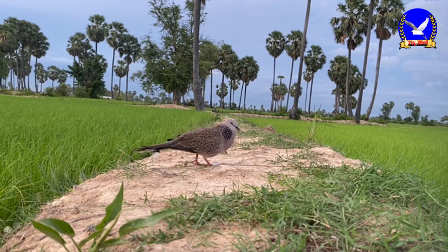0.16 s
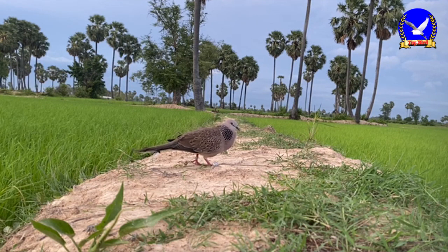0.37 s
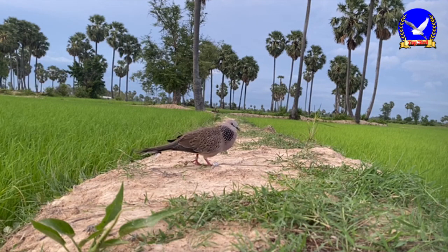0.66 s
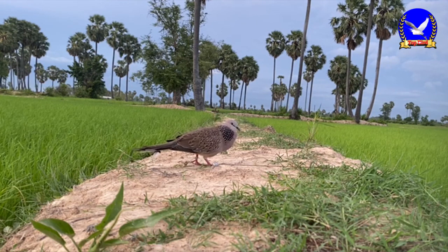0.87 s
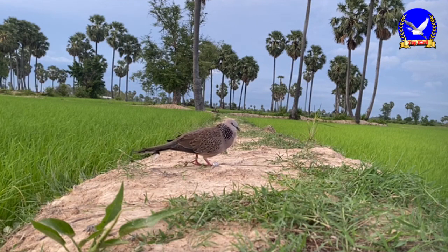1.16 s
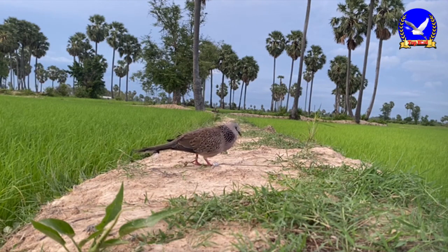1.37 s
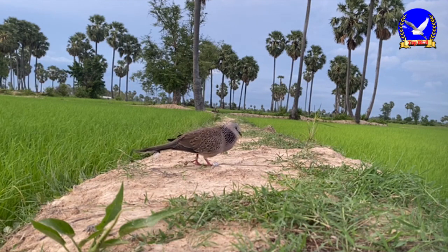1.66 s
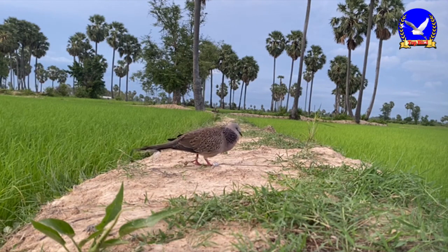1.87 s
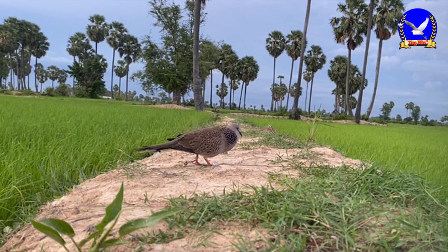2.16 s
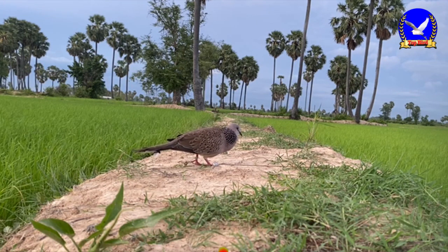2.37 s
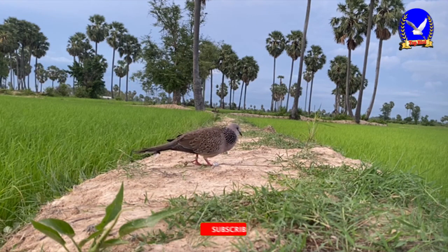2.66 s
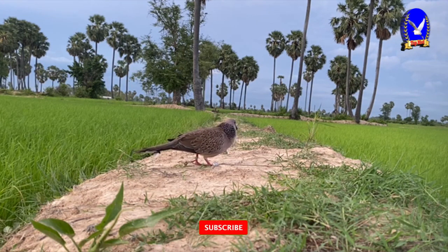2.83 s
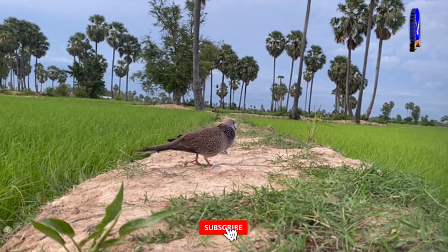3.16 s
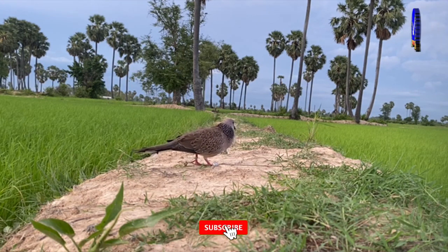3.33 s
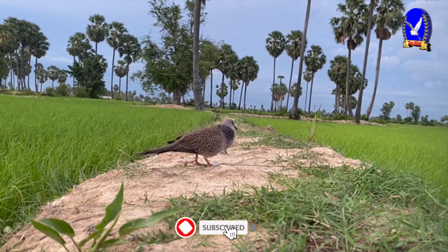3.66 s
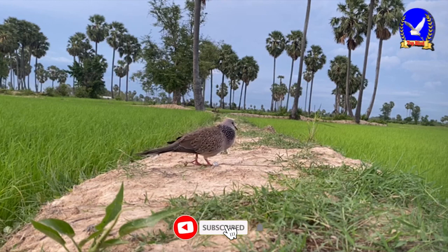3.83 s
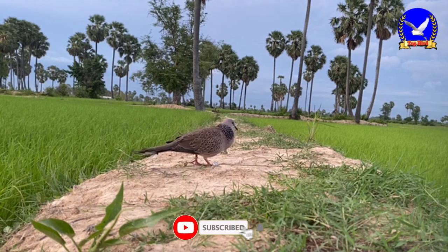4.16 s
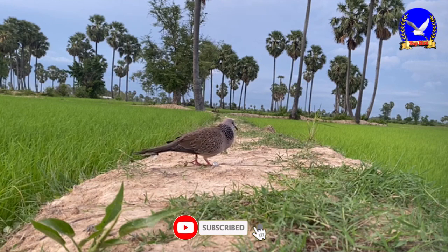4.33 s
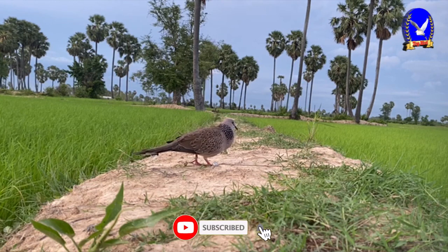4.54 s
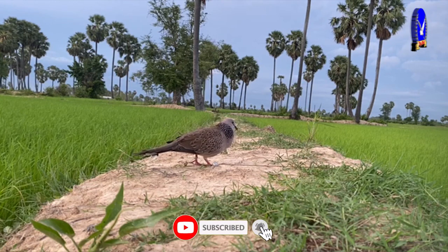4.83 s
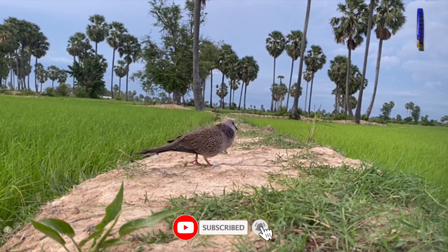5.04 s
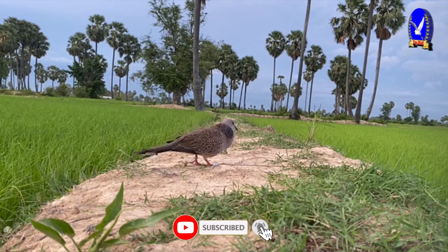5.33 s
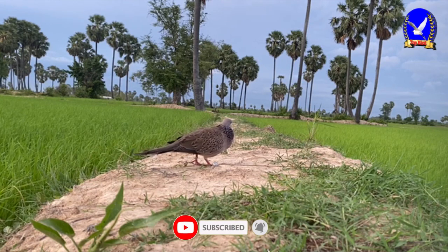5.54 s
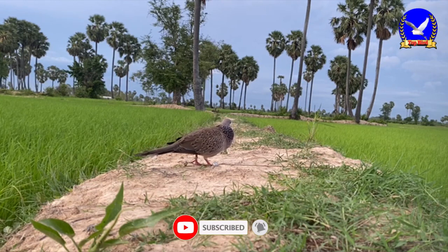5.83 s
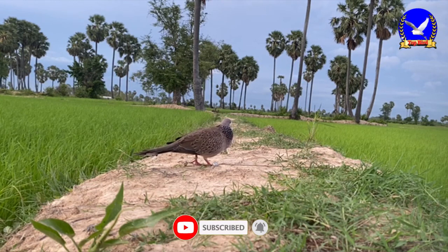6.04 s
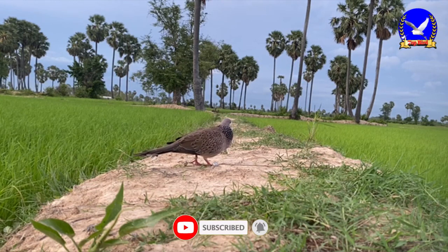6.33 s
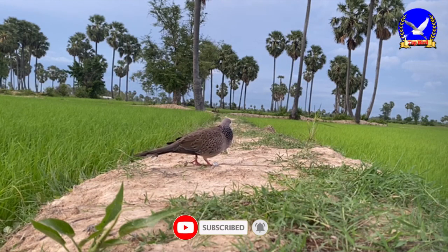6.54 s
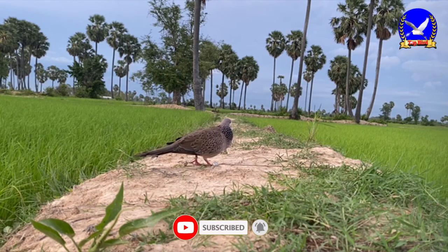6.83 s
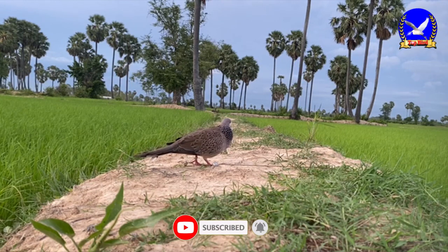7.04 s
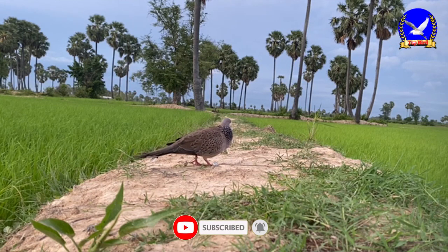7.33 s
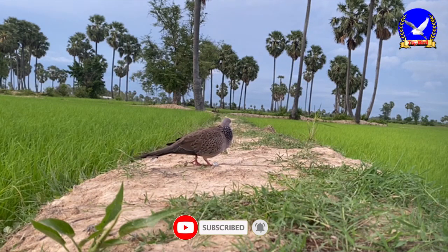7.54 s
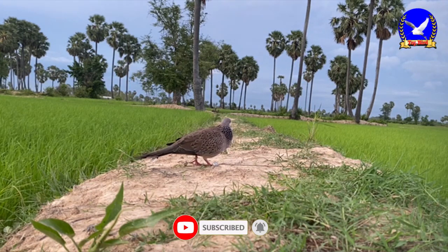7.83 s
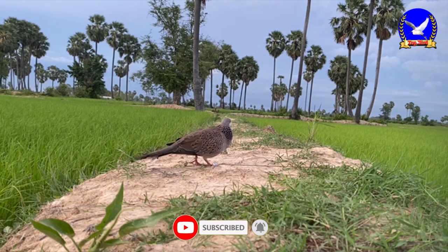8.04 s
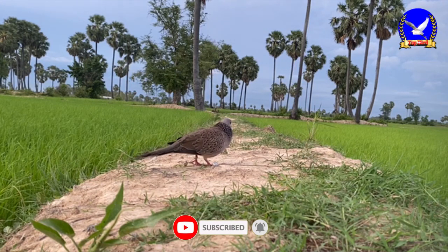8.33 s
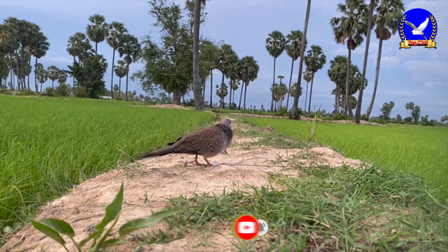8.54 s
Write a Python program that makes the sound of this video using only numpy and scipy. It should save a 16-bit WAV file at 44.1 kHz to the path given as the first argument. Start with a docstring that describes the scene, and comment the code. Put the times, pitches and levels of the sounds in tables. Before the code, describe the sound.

A spotted dove close to the microphone gives mellow, nearly pure coos in short runs, the longer notes chopped into a quickening purr and dropping at the end. Pauses between runs reveal a thin steady insect buzz, faint rasping frogs far off, tiny bird whistles, slight grass rustle and a low, lumpy wind rumble. The place is open farmland, almost without echo.

```python
"""A spotted dove coos close to the microphone on a bank between rice fields, in runs of two or three notes.
Each coo is an almost pure tone that the throat chops into a quickening trill, with faint echoes.
Around it an insect buzzes steadily as pulsed, narrow noise; frogs rasp far off as ringing noise bursts.
Faint marsh notes and small birds are gliding or steady sines, rustling grass is crackling noise, and
light wind rumbles on the microphone as low, lumpy noise."""
import sys
import numpy as np
from scipy import signal
from scipy.fft import rfft, irfft
from scipy.io import wavfile
from scipy.ndimage import uniform_filter1d

SR = 44100
rng = np.random.default_rng(int(sys.argv[2]) if len(sys.argv) > 2 else 0)


def to_wav(sig):
    """Store sig (one row per channel, or 1-D mono) as 16-bit WAV at the path in sys.argv[1].

    Samples outside -1..1 are clipped; the rate is SR.
    """
    pcm = np.clip(np.atleast_2d(sig), -1, 1) * 32767
    pcm = np.round(pcm).astype(np.int16)
    wavfile.write(sys.argv[1], SR, pcm.T)  # frames by channels


N = 383229
TIME = np.arange(N) / SR


def gain_of(db):
    """Decibels to an amplitude factor."""
    return 10 ** (np.asarray(db) / 20)


def evened(x):
    """Scales to rms 1."""
    return x / np.sqrt(np.mean(x ** 2) + 1e-20)


def noise():
    """White noise as long as the scene."""
    return rng.standard_normal(N)


def phase_of(hz):
    """Running phase in radians of a changing frequency."""
    return 2 * np.pi * np.cumsum(hz) / SR


def add(mix, s, sound):
    """Mixes a sound in at time s."""
    part = mix[max(round(s * SR), 0):][:len(sound)]
    part += sound[:len(part)]


def level_at(points):
    """Draws a line through (time [s], level [dB]) points."""
    return np.interp(TIME, *np.transpose(points))


def filtered(x, points):
    """Passes x through a gain curve of (frequency [Hz], level [dB]) points."""
    hz, db = np.transpose(points)
    f = np.fft.rfftfreq(len(x), 1 / SR)
    curve_db = np.interp(np.log(f + 1), np.log(hz), db)
    return irfft(rfft(x) * gain_of(curve_db), len(x))


def coloured(x, points):
    """Shapes the spectrum of x with a gain curve; rms 1."""
    return evened(filtered(x, points))


def ring(x, modes):
    """Passes x through steep resonances; rms 1."""
    f = np.fft.rfftfreq(N, 1 / SR)
    response = sum(gain_of(db) / (1 + (2 * (f - hz) / width) ** 2) for hz, width, db in modes)
    return evened(irfft(rfft(x) * response, N))


def wander(rate):
    """Smooth random drift of rms 1; its spectrum fades out around rate in Hz."""
    f = np.fft.rfftfreq(N, 1 / SR)
    return evened(irfft(rfft(noise()) * np.exp(-(f / rate) ** 2), N))


def swell(s, length, edge):
    """A gate that opens towards 1 and closes again, with soft edges."""
    nearest_end = np.minimum(TIME - s, s + length - TIME)
    return np.sin(np.pi / 2 * np.clip(nearest_end / edge, 0, 1)) ** 2


def mottled(patchy_db):
    """Noise that comes and goes in small patches of time and pitch."""
    z = signal.stft(noise(), nperseg=512, noverlap=384)[2]
    patches = uniform_filter1d(rng.standard_normal(z.shape), size=3, axis=0)  # across pitch
    patches = evened(uniform_filter1d(patches, size=11, axis=1))  # along time
    patchy = z * gain_of(patchy_db * np.clip(patches, -2, 2))
    return signal.istft(patchy, nperseg=512, noverlap=384)[1][:N]


# breeze before the overall trim: (time [s], level [dB])
BREEZE_LEVEL = [(0, -43.5), (1.1, -48.5), (1.6, -45.5), (2.75, -53), (3.15, -46), (4.8, -49), (5.35, -46),
                (7.7, -52), (8.69, -47.5)]
# spectrum of the breeze: (frequency [Hz], relative level [dB])
BREEZE_COLOUR = [(20, -32), (35, -15.5), (55, -1.5), (95, 0.5), (140, -2), (200, -7.5), (300, -11),
                 (450, -22), (700, -29), (1200, -40.5), (2500, -47.5), (6000, -68)]
# buffets of wind on the microphone: (start [s], length [s], level [dB])
GUSTS = [(0.449, 0.3, -40.5), (1.897, 0.57, -43), (4.052, 0.61, -44), (5.853, 0.74, -51), (8.42, .4, -50.5)]


def wind(trim_db=-1.0, lumpy_db=1.0):
    """Wind on the microphone: a low, lumpy noise rumble; gusts add a deeper buffeting."""
    breeze = gain_of(trim_db + level_at(BREEZE_LEVEL) + lumpy_db * wander(12))
    gusts = sum(gain_of(size_db) * swell(s, length, 0.29) for s, length, size_db in GUSTS)
    buffet = coloured(noise(), [(20, -21.5), (38, -17.0), (56, 6.5), (90, -4.5), (135, 4.5),
                                (200, -18.5), (400, -30.5), (2000, -85)])
    return breeze * coloured(noise(), BREEZE_COLOUR) + gusts * buffet


# narrow wing resonance and its overtones: (frequency [Hz], relative level [dB])
BUZZ_COLOUR = [(5800, -49), (6600, -31), (7100, -15.5), (7500, -1), (7790, 2), (8050, -9), (8400, -29),
               (10300, -66), (11300, -34.5), (11700, -23), (12300, -52), (14500, -76.5), (15600, -40),
               (16000, -68)]


def insect(db=-53.0, chirp_depth=0.16, stroke_depth=0.15, chirps_per_s=11.5, strokes_per_s=110.4,
           flicker_db=0.55):
    """Wing strokes grouped in chirps pulse a noise shaped by a narrow wing resonance and overtones."""
    chirp_phase = phase_of(chirps_per_s * (1 + 0.004 * wander(3.6)))
    stroke_phase = phase_of(strokes_per_s * (1 + 0.0048 * wander(3)))
    # strokes come quickest where each chirp is loudest
    stroke = 1 + stroke_depth * np.cos(stroke_phase + np.sin(chirp_phase))
    chirp = 1 + chirp_depth * np.cos(chirp_phase)
    drive = chirp * stroke * gain_of(flicker_db * wander(60))
    return gain_of(db) * coloured(drive * noise(), BUZZ_COLOUR)


# bouts of far rasps: (first call [s], last call [s], calls, level before the hoarse part [dB], shrillness [0-1])
CROAKS = [(.549, .549, 1, -61, 1), (1.01, 1.41, 3, -55.5, .87), (1.74, 2.27, 4, -55, .55),
          (2.629, 3.95, 7, -54.5, .1), (4.039, 4.418, 3, -58.5, 0), (6.995, 7.79, 5, -54.5, .12)]
# ring of the vocal sacs, deep and shrill: (centre [Hz], width [Hz], relative level [dB])
DEEP_SAC = [(2654, 62, 4), (2827, 280, -4.5), (3120, 120, 3.5), (3500, 130, -13), (4050, 140, -13.5)]
SHRILL_SAC = [(2940, 260, -3), (3510, 160, -0.5), (3700, 150, -1)]
# spectrum of the hoarse part: (frequency [Hz], relative level [dB])
CROAK_COLOUR = [(1200, -39.5), (2200, -10.5), (2700, 7.5), (3300, 1), (3800, -11), (4400, -12.5),
                (6500, -36.5)]
# far chorus before its flutter: (time [s], level [dB])
CHORUS_LEVEL = [(0, -64), (1, -61), (2, -59.5), (2.6, -58.5), (3.5, -57), (4.3, -60.5), (5, -64.5),
                (6, -61.5), (7, -62), (8.69, -60.5)]
# spectrum of the chorus: (frequency [Hz], relative level [dB])
CHORUS_COLOUR = [(600, -5), (1400, -15), (1700, -3), (2150, -6.5), (2800, 1.5), (3400, 1), (4000, -4),
                 (4600, -13.5), (6000, -21.5), (8500, -29), (10000, -55.5)]


def frogs(length=0.064, edge=0.017, hoarse_db=-11, rasp_rate=115, rasp_depth=0.1, flutter_db=1.92,
          patchy_db=4.0):
    """Short noise rasps ring in the vocal sacs and stand out of the blur of a far chorus."""
    deep, shrill = ring(noise(), DEEP_SAC), ring(noise(), SHRILL_SAC)
    hoarse = gain_of(hoarse_db) * coloured(noise(), CROAK_COLOUR)
    calls = np.zeros(N)
    for first, last, count, db, share in CROAKS:
        share = np.clip(share, 0, 1)
        gates = sum(swell(s, length, edge) for s in np.linspace(first, last, round(count)))
        voice_mix = np.sqrt(1 - share) * deep + np.sqrt(share) * shrill + hoarse
        calls += gain_of(db) * gates * voice_mix
    rasp = 1 + rasp_depth * np.cos(phase_of(rasp_rate * (1 + 0.15 * wander(18))))
    chorus = gain_of(level_at(CHORUS_LEVEL) + flutter_db * wander(2.8))
    return calls * rasp + chorus * coloured(mottled(patchy_db), CHORUS_COLOUR)


def peeps(hz=1740, per_s=18, db=-76, length=0.049, spread=0.076):
    """Scattered faint sine notes of far marsh animals, smeared by distance."""
    out, t = np.zeros(N), TIME[:round(length * SR)]
    for when, pitch, size in rng.random((round(per_s * N / SR), 3)):
        note_hz = hz * (1 + spread * (2 * pitch - 1))
        note = np.sin(2 * np.pi * note_hz * t) * np.hanning(len(t))
        add(out, when * N / SR, gain_of(10 * size) * note)
    return gain_of(db) * evened(out * wander(70))


# rustles in the grass, before soft edges widen them: (start [s], length [s], level [dB])
RUSTLES = [(.06, 0.016, -61.5), (0.714, 0.19, -59), (1.218, 0.042, -63.5), (1.47, 0.1, -63),
           (3.184, 0.12, -64), (4.562, 0.069, -62), (5.268, 0.16, -66), (6.25, 0.052, -67),
           (7.74, 0.057, -63)]
# spectrum of the dry blades: (frequency [Hz], relative level [dB])
RUSTLE_COLOUR = [(800, -17.5), (2500, -2.5), (4800, 4), (6500, -6.5), (9300, -27), (11000, -48.5)]


def grass(crackle_db=4.0, patchy_db=5):
    """Dry blades brush together in clumps of patchy, crackling noise."""
    level = sum(gain_of(db) * swell(s - .01, length + 0.018, length / 2) for s, length, db in RUSTLES)
    crackle = mottled(patchy_db) * gain_of(crackle_db * wander(130))
    return level * coloured(crackle, RUSTLE_COLOUR)


def trill(start, end, pulses, speed_up=0, shut_share=0.23):
    """A roll of throat closures as (time s, half width s, depth) that quickens if speed_up is positive."""
    u = np.linspace(0, 1, 200)
    count_share = np.linspace(0, 1, round(pulses) + 1)
    at = start + (end - start) * np.interp(count_share, u + speed_up * u * (u - 1), u)
    period = np.gradient(at)
    late, wide, weak = rng.standard_normal((len(at), 3)).T
    at = at + .03 * period * late
    return list(zip(at, shut_share * period * np.exp(0.16 * wide), 1 - .1 * abs(weak)))


# rolls of the full coos, in turn: (start [s], end [s], pulses, speed-up [share of the mean rate])
TRILLS = [(0.174, 0.522, 20, 0.24), (1.164, 1.249, 7, 0.046), (1.44, 1.466, 2, 0), (3.336, 3.692, 20, 0.29),
          (5.339, 5.787, 26, 0.24)]
CATCH_GAP_S, CATCH_DEPTH = .057, 0.79  # after its roll a coo catches at even gaps
HOOT_CATCH_S, HOOT_CATCH_DEPTH = .065, 0.65  # time from the start of the hoot
PURR_S, PURR_PULSES_PER_S = 0.074, 65
RISER_ROLL_START_S, RISER_ROLL_END_S, RISER_PULSES_PER_S = .009, .047, 78  # the climb is rolled


def closures(catch_s=0.0037, hoot_catch_s=.0045):
    """Every brief closing of the throat as (time s, half width s, depth): trills, purrs, single catches."""
    rows = []
    for (start, length, *_), roll in zip(COOS, TRILLS):
        rows += trill(*roll)
        catches = np.arange(roll[1] + CATCH_GAP_S, start + length, CATCH_GAP_S)
        rows += [(s, catch_s, CATCH_DEPTH) for s in catches]
    for start, *_ in HOOTS:
        end = start + HOOT_ARCH[-1][0]
        rows += [(start + HOOT_CATCH_S, hoot_catch_s, HOOT_CATCH_DEPTH)]
        rows += trill(end, end + PURR_S, PURR_S * PURR_PULSES_PER_S)
    for start, *_ in RISERS:
        pulses = (RISER_ROLL_END_S - RISER_ROLL_START_S) * RISER_PULSES_PER_S
        rows += trill(start + RISER_ROLL_START_S, start + RISER_ROLL_END_S, pulses)
    return rows


SLACK_HZ, OPENING_HZ, SCOOP_S = 435, 470, 0.011  # a coo scoops up from a slack throat
BREAK_S, TAIL_SAG_HZ_PER_S, FALL_S = 0.04, 360, 0.022


def coo_pitch(length, slack_s, break_s, top_hz, break_hz, tail_hz):
    """A full coo scoops up, sags, breaks to a lower register and falls slack."""
    t = TIME[:round(length * SR)]
    tail = length - break_s
    low, fall = break_s + min(BREAK_S, tail / 2), length - min(FALL_S, tail / 2)
    sagged_hz = tail_hz - TAIL_SAG_HZ_PER_S * (fall - low)
    held = np.interp(t, [0, break_s, low, fall, length], [top_hz, break_hz, tail_hz, sagged_hz, SLACK_HZ])
    return held - (top_hz - OPENING_HZ) * np.exp(-np.maximum(t - slack_s, 0) / SCOOP_S)


def arch_pitch(arch, top_hz):
    """A short note follows the arch of its kind."""
    s, share = np.transpose(arch)
    return top_hz * np.interp(TIME[:round(s[-1] * SR)], s, share)


# Note pitches are before the throat's lift and droop; levels are relative to LOUDNESS.
# full coos: (start [s], length [s], slack start [s], break after start [s], pitch at top [Hz],
# at the break [Hz], after it [Hz], level [dB])
COOS = [(.156, .577, 0.015, 0.38, 675, 590.5, 524.7, 0.4),
        (1.134, 0.16, 0.0085, .13, 628.8, 579.5, 554.3, 0), (1.432, .368, .019, .319, 662.6, 572.3, 490, 0),
        (3.324, .597, .015, 0.4, 703, 600, 539.7, 0.5),
        (5.324, 0.493, .015, .376, 695.5, 598.3, 557.3, -0.16)]
# short hoots that open a run: (start [s], top pitch [Hz], level [dB], level of the trailing purr [dB])
HOOTS = [(2.849, 641, -.5, -18), (4.877, 651, 0.5, -14), (8.23, 640, 0, -26)]
# the hoot leaps up, holds and drops: (time from its start [s], pitch [share of the top])
HOOT_ARCH = [(0, .74), (.013, .775), (0.029, 0.96), (.059, 0.99), (.069, .77), (.089, .69)]
# rising notes that follow: (start [s], top pitch [Hz], level [dB])
RISERS = [(3.046, 686.7, 0), (5.051, 676.6, -0.26), (8.421, 698.8, -0.5)]
# they climb slowly and fall at once: (time from the start [s], pitch [share of the top])
RISER_ARCH = [(0, .69), (.026, .79), (.056, 0.95), (.086, 0.98), (.112, .85), (.123, .68)]
# the voice is loudest in the middle of its range: (pitch [Hz], level [dB])
LOUDNESS = [(430, -37.5), (475, -26), (512, -21), (570, -18), (600, -17.5), (650, -19), (700, -20.5)]
COO_ATTACK_S, HOOT_ATTACK_S, RISER_ATTACK_S = 0.017, 0.018, .032
PURR_HZ, PURR_SAG_HZ = 483.4, 34
ONSET_DB, GATE_S = -7.5, 0.0067  # every note swells from below and has soft edges


def voice():
    """Pitch, level and age of the sounding note; the level swells at the onset, then follows the pitch."""
    notes = [(start, coo_pitch(*shape), db, COO_ATTACK_S) for start, *shape, db in COOS]
    notes += [(start, arch_pitch(RISER_ARCH, hz), db, RISER_ATTACK_S) for start, hz, db in RISERS]
    purr_hz = PURR_HZ - np.linspace(0, PURR_SAG_HZ, round(PURR_S * SR))
    for start, hz, db, purr_db in HOOTS:
        notes += [(start, arch_pitch(HOOT_ARCH, hz), db, HOOT_ATTACK_S),
                  (start + HOOT_ARCH[-1][0], purr_hz, purr_db, GATE_S)]
    pitch, level, age = np.full(N, float(SLACK_HZ)), np.zeros(N), np.zeros(N)
    for start, hz, db, attack_s in notes:
        t = TIME[:len(hz)]
        gate = np.sin(np.pi / 2 * np.minimum(np.minimum(t, t[-1] - t) / GATE_S, 1))
        onset_db = ONSET_DB * np.maximum(1 - t / attack_s, 0)
        add(level, start, gate * gain_of(db + np.interp(hz, *np.transpose(LOUDNESS)) + onset_db))
        add(pitch, start, hz - SLACK_HZ)
        add(age, start, t)
    return pitch, level, age


def crop(hz, centre_hz=540, width_hz=85, lift=0.78):
    """Response of the inflated crop: one resonance that rings on between the pulses."""
    return 1 + lift / (1 + 2j * (hz - centre_hz) / width_hz)


def husk(phase, age, start_db=-48, rise_db_per_s=30, blur=.7, rasp_db=-5):
    """A faint, blurred octave and noisy rasp that grow with a note's age, as its air runs out."""
    octave = np.sqrt(2) * np.sin(2 * phase + blur * wander(80))
    rasp = coloured(noise(), [(500, -29.0), (850, 1.5), (1000, 2.5), (1120, -3), (1300, -23),
                              (1600, -35), (4000, -80.5)])
    return gain_of(start_db + rise_db_per_s * age) * (octave + gain_of(rasp_db) * rasp)


# the band that the swollen neck radiates: (frequency [Hz], level [dB])
NECK_BAND = [(200, -25.5), (330, -5.5), (440, -1), (700, 1), (800, -8.5), (880, -10.5), (1300, -17),
             (2500, -22.5)]
# the throat colours the overtones and rasp: (frequency [Hz], level [dB])
THROAT = [(800, -0.5), (980, 2), (1100, -2), (1190, -15.5), (1260, -6.5), (1350, -1.5), (1480, -17.5)]


def dove(sag=.15, sag_width=1.2, slip_turns=0.27, jitter=0.016, shimmer_db=1.15, lift=.018):
    """A near sine; each closure pinches it off, drags its pitch down and lets its phase slip."""
    opening, droop, slip = np.ones(N), np.zeros(N), np.zeros(N)
    for s, width, depth in closures():
        near = slice(round((s - .02) * SR), round((s + .02) * SR))
        u = (TIME[near] - s) / width
        opening[near] *= 1 - np.clip(depth, 0, 1) * np.exp(-abs(u) ** 3.4)
        droop[near] += depth * np.exp(-(u / sag_width) ** 2)
        pinch = np.exp(-(2.0 * u) ** 2)
        slip[near] += slip_turns * depth * rng.standard_normal() * pinch / pinch.sum()
    pitch, level, age = voice()
    level = level * gain_of(shimmer_db * wander(140)) * opening
    bent_pitch = pitch * (1 + lift * opening - sag * droop + jitter * wander(140))
    phase = 2 * np.pi * np.cumsum(bent_pitch / SR + slip)
    # divided by the crop's gain, so that the level holds once the crop has rung
    tone = level / abs(crop(pitch)) * np.sqrt(2) * np.sin(phase)
    tone = irfft(rfft(tone) * crop(np.fft.rfftfreq(N, 1 / SR)), N)
    return filtered(tone, NECK_BAND) + filtered(level * husk(phase, age), THROAT)


NEAR_T60_S, FAR_T60_S = .13, 1.3  # time to decay by 60 dB


def field(x, near_db=-24.5, far_db=-42):
    """Weak scatter from the ground close by, then from the distant trees, as sparse random echoes."""
    t = TIME[:SR]
    echoes = rng.standard_normal((2, SR)) * (rng.random((2, SR)) < 2000 / SR)  # about 2000 a second
    near, far = echoes * (t > .008)
    near, far = near * gain_of(-60 * t / NEAR_T60_S), far * gain_of(-60 * t / FAR_T60_S)
    ground = signal.fftconvolve(x, near / np.linalg.norm(near))[:N]
    # swaying leaves make the far echo flutter and smear its pitch
    trees = signal.fftconvolve(x, far / np.linalg.norm(far))[:N] * wander(71)
    return gain_of(near_db) * ground + gain_of(far_db) * trees


# quick twitters of a small bird: (start [s], length [s], chirps [per s], level before chirp shaping [dB])
TWITTERS = [(0.753, 0.082, 57, -68), (3.199, 0.11, 72, -66)]


def twitter(top_hz=5300, fall_hz=1200, blur=1.8):
    """Runs of tiny sine down-sweeps, blurred in phase by distance."""
    out = np.zeros(N)
    for s, length, per_s, db in TWITTERS:
        u = (TIME - s) * per_s % 1  # progress through each chirp
        phase = phase_of(top_hz - fall_hz * u) + blur * wander(250)
        chirps = 2 * np.sin(np.pi * u) ** 4 * np.sin(phase)
        out += gain_of(db) * swell(s, length, 0.0062) * chirps
    return out


# far whistles: (start [s], length [s], first pitch [Hz], pitch approached [Hz], level before flicker [dB])
WHISTLES = [(2.3, 0.12, 5020, 4690, -60), (4.012, 0.12, 5060, 4760, -59.5), (4.4, 0.17, 4140, 4180, -73),
            (7.474, 0.15, 1450, 1414, -66.5), (4.444, 0.028, 3280, 3220, -48.5),
            (8.274, 0.09, 3610, 3603, -62)]


def birds(settle_s=0.03):
    """Thin sine whistles far off that slide and level off, flickering in level."""
    out = np.zeros(N)
    for s, length, first_hz, last_hz, db in WHISTLES:
        hz = last_hz + (first_hz - last_hz) * np.exp(-np.maximum(TIME - s, 0) / settle_s)
        out += gain_of(db) * swell(s, length, 0.02) * np.sqrt(2) * np.sin(phase_of(hz))
    return out * gain_of(1.05 * wander(50))


def scene():
    """The near dove over the life of the fields, on one microphone."""
    backdrop = wind() + insect() + frogs() + peeps() + grass()
    coos = dove()
    return (backdrop + coos + field(coos) + twitter() + birds())[None]


def record(dry, edge_hz=15830):
    """The recorder's band limit: a steep low-pass."""
    low_pass = signal.firwin(511, edge_hz, window=("kaiser", 9), fs=SR)
    return signal.oaconvolve(dry, low_pass[None], "same")


dry = scene()
out = record(dry)
to_wav(out)
```